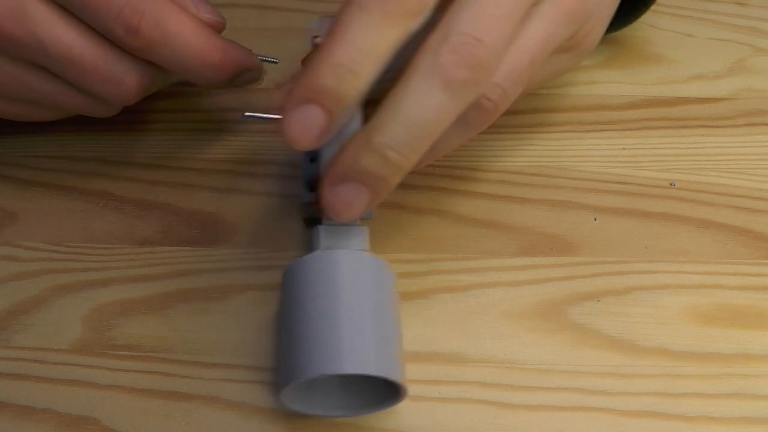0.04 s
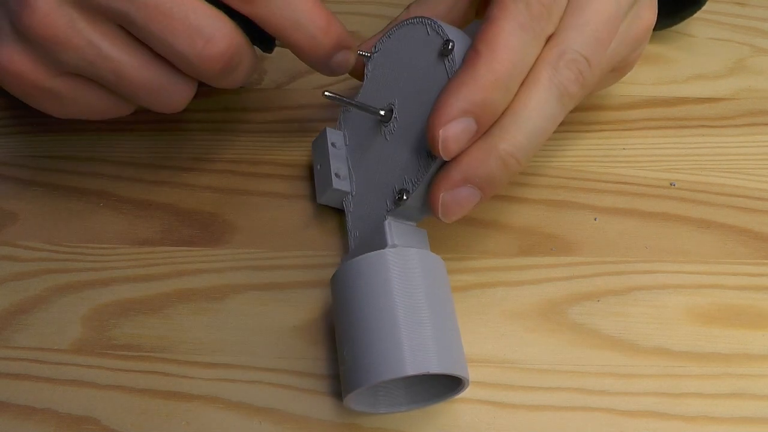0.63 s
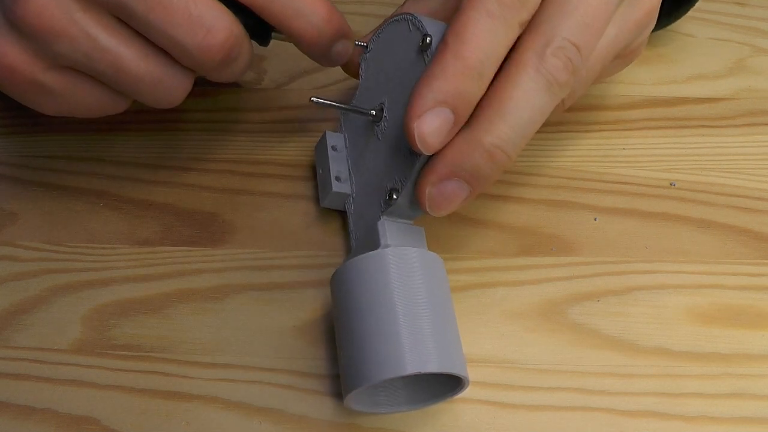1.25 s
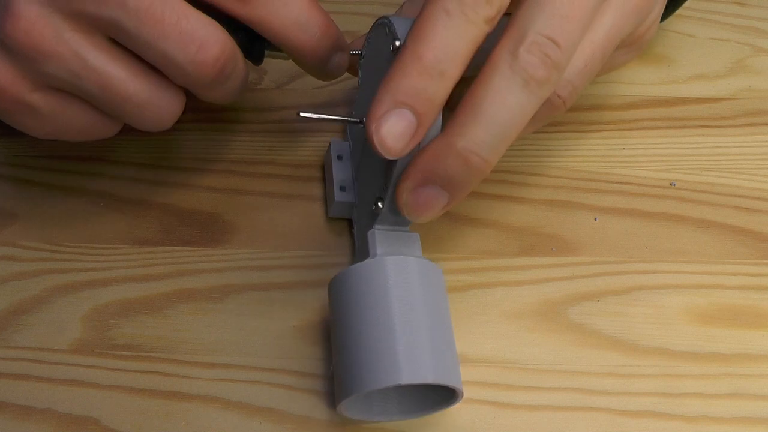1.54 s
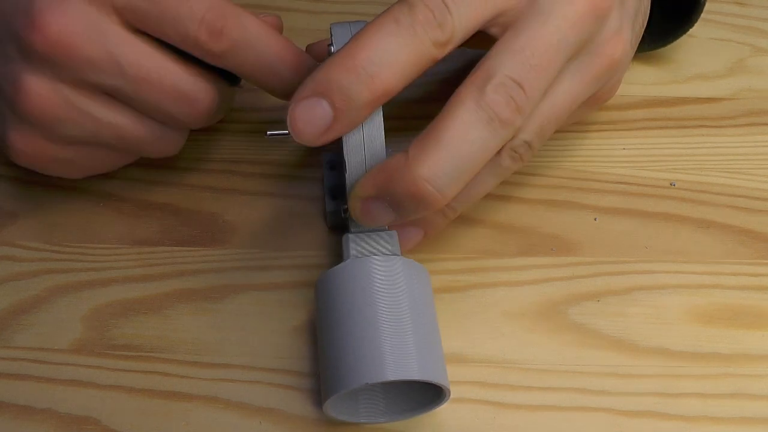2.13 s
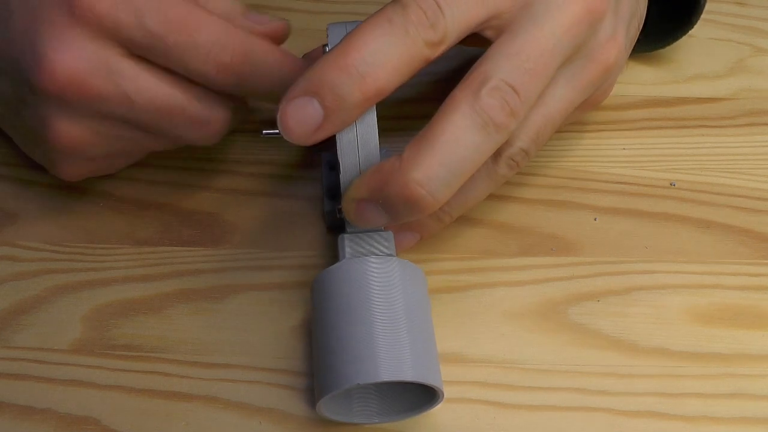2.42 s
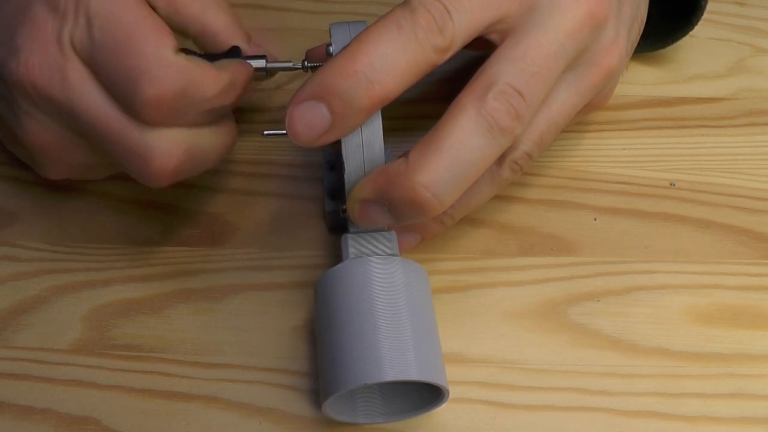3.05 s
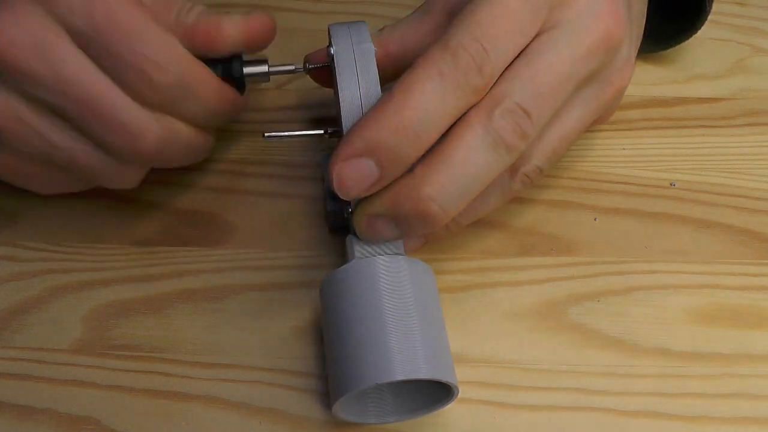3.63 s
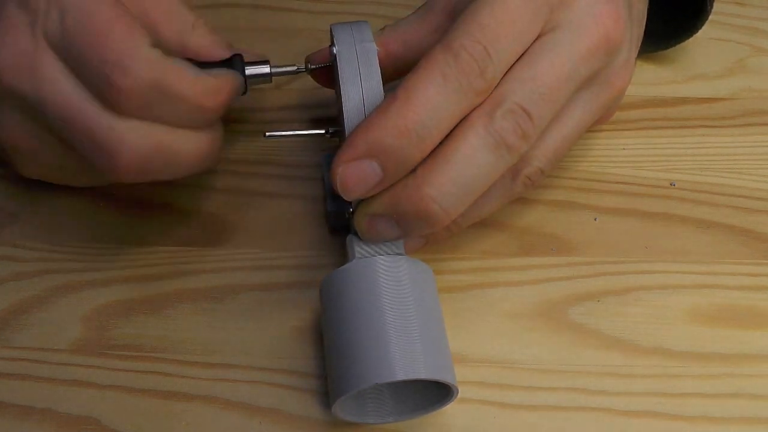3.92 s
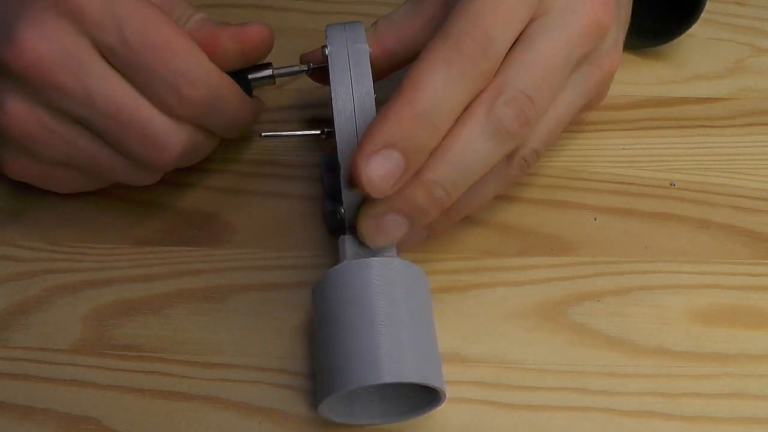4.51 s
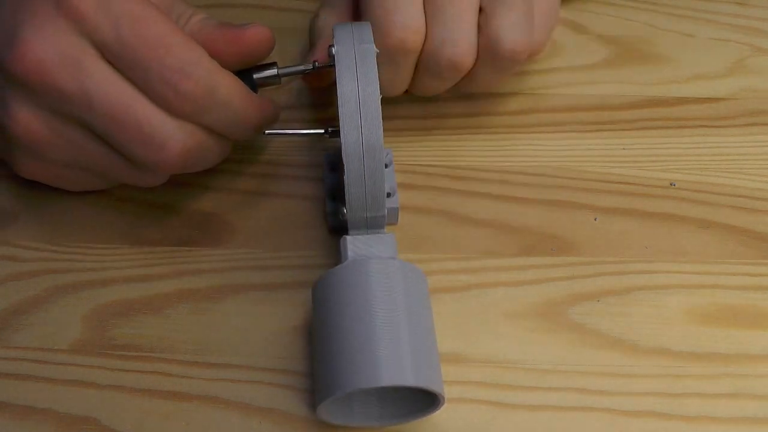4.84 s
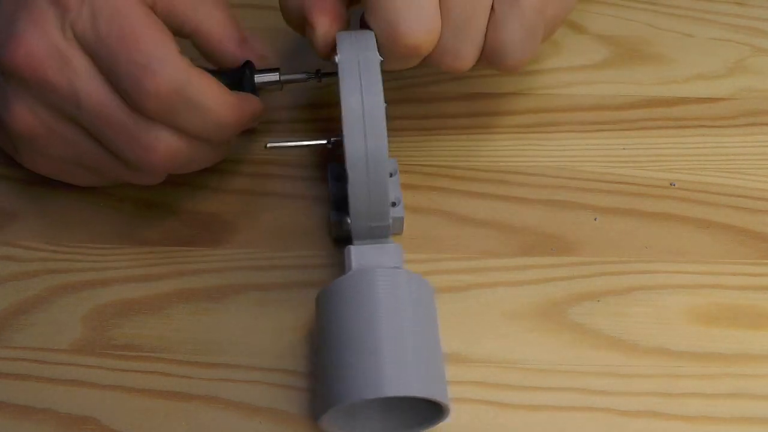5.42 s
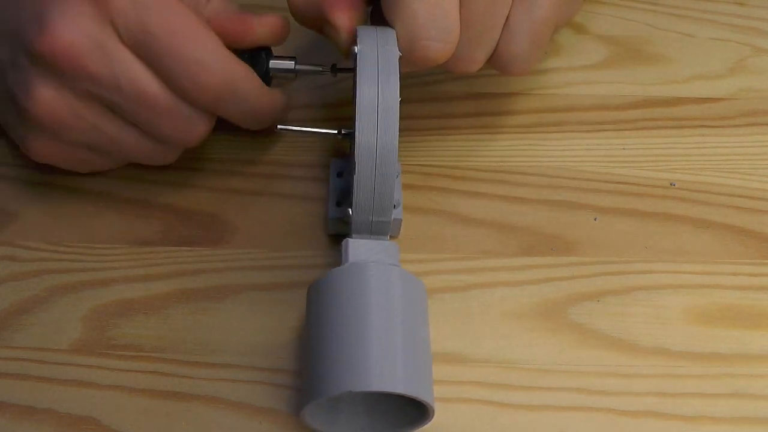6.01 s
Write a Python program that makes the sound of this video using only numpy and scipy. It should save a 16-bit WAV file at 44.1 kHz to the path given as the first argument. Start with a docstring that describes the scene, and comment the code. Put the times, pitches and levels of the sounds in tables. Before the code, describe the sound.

Close to the microphone in a small, quiet room, a plastic part is handled with irregular taps and soft skin rubbing. After a sharp metallic click, a small screwdriver ticks and slips in a screw head, giving brief creaks as it turns. Then the hollow plastic clatters, bumps and drags on a wooden workbench, shaking a loose metal pin into faint jingles, and a few light ticks follow.

```python
"""At a wooden bench in a small room, a small screwdriver turns a screw into a hollow plastic housing.
The bit ticks and slips in the screw head, the housing clacks and bumps on the wood, and a loose steel
pin jingles. Each knock makes the parts ring with their own quickly fading tones. Rubbing fingers,
twists and scrapes are thousands of tiny slips. It all sounds close and central, over a low hush."""
import sys
import numpy as np
from scipy import signal
from scipy.fft import rfft, irfft, next_fast_len
from scipy.io import wavfile

SR = 44100
rng = np.random.default_rng(int(sys.argv[2]) if len(sys.argv) > 2 else 0)


def output_pcm(signal):
    """Save a mono or channel-first signal as 16-bit PCM at the path in sys.argv[1].

    Samples are clipped to [-1, 1] before scaling.
    """
    pcm = np.clip(np.atleast_2d(signal).T, -1, 1) * 32767
    wavfile.write(sys.argv[1], SR, np.round(pcm).astype(np.int16))


N = 276066
TIME = np.arange(N) / SR
AGE = TIME[:SR // 3]   # seconds since a sound began

# Levels in the tables are relative: the functions may turn a whole layer up or down.
# Tone colour of the room's hush: pitch_hz, level_db
HUSH_COLOUR = [(15, -57), (25, -56), (59, -19), (229, -1), (624, -18.5), (714, -13), (887, -7.5),
               (1560, -6), (2110, -23.5), (3250, -11.5), (4490, -10.5), (5730, -21), (7310, -25),
               (14400, -16.5), (16000, -22)]
# Echoes from nearby surfaces: delay_s, level_db
ECHOES = [(0.009, -25), (0.0148, -20), (0.0168, -22), (0.0305, -23), (0.0362, -25)]
# The room's fading tail (fade_s is the time to drop by 60 dB): pitch_hz, fade_s, level_db
ROOM_DECAY = [(121, 0.11, -21), (302, 0.2, -5), (684, 0.3, -9), (1495, 0.31, -13), (3540, 0.27, -11.5),
              (7040, 0.33, -13.5), (14000, 0.092, -37)]
# Standing waves, the tones that bench and room add to each sound: pitch_hz, level_db, fade_s
STANDING_WAVES = [(267, 1, 0.28), (347, -2, 0.24), (492, -2, 0.22), (607, -7, 0.2), (679, -6, 0.22),
                  (926, -7, 0.22), (1197, -9, 0.2), (1390, -9, 0.2), (1675, -6, 0.22)]

# Tone colours of rubbing: pitch_hz, level_db
RUMBLE_COLOUR = [(50, -47), (85, -5.5), (150, -2.5), (220, 3.5), (270, -2), (330, -7), (450, -5.5),
                 (700, -33)]   # hands stirring the bench
PLASTIC_COLOUR = [(250, -32), (500, -4), (750, -2.5), (1000, -1), (1250, 1), (1550, 2), (1750, -2),
                  (2050, -9), (2380, -3), (2700, -7.5), (3050, -8), (4600, -17), (6000, -25.5),
                  (16000, -100)]   # rubbed plastic
HISS_COLOUR = [(2500, 10), (4000, 11.5), (5200, 1.5), (6000, 4.5), (6900, 5.5), (8000, 3), (10000, 5),
               (13000, 8.5), (16000, -7)]   # skin and other sliding contacts
DRAG_COLOUR = [(50, -42), (100, -24), (160, -11), (225, 0), (270, 2), (340, -1), (450, -4), (700, -15),
               (1200, -35)]   # a low drag on the wood
# How strongly the fingers work over time: time_s, bench_db, plastic_db, skin_db
FINGER_LEVELS = [(0.0, -61, -66, -72), (0.16, -51.5, -65, -74), (0.3, -55.5, -51.5, -65),
                 (0.87, -62.5, -63.5, -78), (1.32, -62, -60.5, -76), (1.43, -63.5, -62, -72),
                 (2.02, -58, -63, -74), (2.35, -64, -54.5, -65), (2.91, -65, -66, -70.5),
                 (3.63, -58, -62.5, -64.5), (3.9, -60.5, -60.5, -63), (4.27, -61.5, -62.5, -66),
                 (5.33, -60.5, -56.5, -67.5), (5.6, -61, -50, -64), (5.82, -63.5, -55.5, -64.5),
                 (6.26, -61.5, -68.5, -61)]
# Twists of the screwdriver: middle_s, half_length_s, creak_db, bit_hiss_db
TWISTS = [(2.125, 0.0065, -56, -59), (2.86, 0.028, -52, -52.5), (3.057, 0.019, -53.5, -50),
          (3.26, 0.02, -57, -59.5), (3.36, 0.064, -63, -64.5), (3.506, 0.046, -54, -59),
          (3.612, 0.021, -50.5, -57), (3.73, 0.055, -52, -65), (3.921, 0.027, -57, -55.5),
          (4.101, 0.02, -42.5, -51), (4.151, 0.042, -47, -63), (4.308, 0.018, -65, -60),
          (4.46, 0.024, -52, -55), (4.524, 0.019, -52, -58), (4.622, 0.017, -50, -62),
          (6.11, 0.038, -63.5, -61)]
# Short scrapes and rattles in the plastic, some with a low drag on the wood:
# middle_s, half_length_s, bench_db, plastic_db
SCRAPES = [(0.085, 0.072, -57, -65), (0.152, 0.016, -52, -41.5), (0.195, 0.041, -74, -49.5),
           (0.276, 0.006, -63, -40.5), (0.726, 0.016, -53, -66), (0.882, 0.02, -57.5, -56),
           (1.416, 0.021, -52, -44), (4.997, 0.034, -44, -42.5), (5.41, 0.059, -52, -55.5),
           (5.573, 0.028, -53, -47.5), (5.654, 0.022, -39, -35), (5.765, 0.085, -62, -51)]

# The tones each part rings with when struck: pitch_hz, level_db, fade_s
BENCH_TONES = [(144.5, -9, 0.058), (220, -6.5, 0.054), (264, 1.5, 0.029), (351, -8, 0.047),
               (424.5, -7, 0.042), (530.6, -10, 0.092)]
CUP_TONES = [(586, -5, 0.035), (737, 4.5, 0.051), (837, 0, 0.047), (940, -4, 0.017), (1025, -6, 0.045)]   # the lower ring of the hollow plastic
HOUSING_TONES = [(1210, -7, 0.018), (1400, -3, 0.022), (1465, 0, 0.016), (1620, -7, 0.016)]
SCREW_TONES = [(2355, -6, 0.024), (2620, -3, 0.008), (3040, 0, 0.014), (3250, -4, 0.01), (3600, -4, 0.011),
               (4050, -4, 0.008), (4620, -6, 0.011)]
BIT_TONES = [(5340, -2, 0.01), (6000, -6, 0.005), (6820, -1, 0.012), (7600, -4, 0.006), (8950, -1, 0.005),
             (9800, 1, 0.004), (10800, 0, 0.004), (11900, -2, 0.004), (13500, -9, 0.003)]
PIN_TONES = [(2352, 1, 0.28), (2900, -4, 0.17), (3060, -3, 0.17), (4580, -7, 0.14), (4662, -2, 0.22),
             (4740, -8, 0.12), (5507, -8, 0.15), (6780, -4, 0.15), (6970, -6, 0.11), (8570, -6, 0.18),
             (8700, -6, 0.13), (11000, -3, 0.16), (12910, -10, 0.14), (13860, -10, 0.12)]
# Jolts that shake the loose pin: start_s, level_db
JINGLES = [(0.144, -55), (0.191, -60), (4.976, -62), (5.009, -52), (5.407, -56), (5.546, -52.5), (5.7, -43),
           (5.719, -56), (5.761, -70), (5.816, -66)]
# Knocks, with the housing's pitch under that grip: start_s, housing_db, bench_db, bit_db, pitch_hz
KNOCKS = [(0.131, -45, -47, -85, 1400), (0.144, -46, -65, -62, 1230), (0.278, -31.5, -43.5, -71, 1524),
          (0.286, -31.5, -50, -86, 1455), (0.342, -47.5, -65, -75, 1540), (0.4, -49, -59, -70, 1480),
          (0.666, -51, -70, -84, 1630), (0.704, -45.5, -52, -68, 1270), (0.87, -51, -47, -92, 1300),
          (0.976, -47.5, -53, -73, 1410), (1.097, -37, -47, -56.5, 1224), (1.149, -49, -46.5, -80, 1550),
          (1.212, -37.5, -52, -70.5, 1424), (1.361, -27.5, -50, -42, 1325), (1.415, -54, -47, -72, 1390),
          (1.6418, -41, -34, -74, 1300), (1.885, -54.5, -55, -78, 1540), (2.171, -55, -52, -71, 1350),
          (2.194, -46.5, -62, -58, 1430), (2.2968, -48, -37.5, -39, 1400), (2.299, -21, -43, -28, 1354),
          (2.5626, -31.5, -39.5, -46, 1450), (2.821, -57, -62, -58, 1570), (2.861, -44, -50.5, -57, 1450),
          (2.941, -64, -54.5, -63, 1400), (3.032, -53, -60, -79, 1460), (3.047, -52, -75, -50, 1380),
          (3.053, -52.5, -55, -51, 1350), (3.15, -51, -63, -73, 1480), (3.222, -54, -54, -79, 1560),
          (3.312, -58.5, -63, -60, 1510), (3.366, -53.5, -50.5, -66, 1560), (3.399, -70, -55, -62, 1450),
          (3.481, -47.5, -52, -55.5, 1230), (3.6, -47, -77, -56.5, 1680), (3.65, -49, -64, -59.5, 1250),
          (3.666, -40.5, -52, -67, 1340), (3.861, -52.5, -57, -68, 1270), (4.011, -51, -57, -69, 1390),
          (4.025, -41, -49, -59, 1690), (4.059, -50, -51, -70, 1390), (4.09, -44, -45, -66, 1550),
          (4.151, -41.5, -52, -58, 1470), (4.176, -51.5, -49.5, -64, 1270), (4.277, -59, -50, -77, 1230),
          (4.4, -44.5, -53, -60, 1510), (4.469, -47.5, -56, -60, 1560), (4.491, -50, -48, -62, 1400),
          (4.556, -45.5, -52, -70, 1420), (4.617, -53, -45.5, -70, 1380), (4.977, -39.5, -31, -74, 1230),
          (4.987, -42, -39, -72, 1290), (4.998, -39, -34, -75, 1270), (5.009, -44, -51, -52.5, 1380),
          (5.024, -42, -38.5, -67, 1760), (5.036, -33, -41.5, -71, 1553), (5.043, -27.5, -48, -60, 1444),
          (5.25, -39.5, -61, -64, 1386), (5.376, -51, -52, -66, 1340), (5.407, -41.5, -57, -43, 1470),
          (5.423, -43.5, -39, -62, 1240), (5.446, -45, -44, -63, 1370), (5.509, -39, -49.5, -55.5, 1450),
          (5.546, -40.5, -55, -46, 1790), (5.563, -41, -46.5, -64, 1440), (5.635, -28.5, -51, -79, 1500),
          (5.647, -29.5, -28.5, -46.5, 1420), (5.668, -36, -38, -72, 1360), (5.7, -29, -45, -44.5, 1446),
          (5.718, -39, -48, -47, 1590), (5.76, -46, -61, -67, 1490), (6.03, -46.5, -55, -66, 1380),
          (6.093, -51, -72, -61, 1600), (6.124, -52.5, -61, -63, 1460), (6.243, -45, -59, -65, 1430)]

HOUSING_HZ = 1424   # a knock with this pitch_hz plays HOUSING_TONES at their usual pitch
ATTACK_S = 0.008   # the opening of a knock, which sets its level


def from_db(db):
    """Turn decibels into a number to multiply by."""
    return 10 ** (np.asarray(db) / 20)


def rms_one(x):
    """Scale a sound so that its average strength (rms) is 1."""
    return x / np.sqrt(np.mean(x ** 2) + 1e-20)


def band(x, low_hz, high_hz, order=2):
    """Keep the part of a sound between two pitches."""
    sos = signal.butter(order, [low_hz, min(high_hz, .45 * SR)], "band", fs=SR, output="sos")
    return signal.sosfilt(sos, x + 1e-18)


def coloured(x, colour):
    """Give a steady noise a tone colour and a strength of 1."""
    hz, db = np.transpose(colour)
    size = next_fast_len(N)
    bins_hz = np.maximum(np.arange(size // 2 + 1) * SR / size, 1)
    gains = from_db(np.interp(np.log(bins_hz), np.log(hz), db))
    return rms_one(irfft(rfft(x, size) * gains, size)[:N])


def add(track, start_s, sound):
    """Mix a sound into a track at the given time."""
    start = max(int(round(start_s * SR)), 0)
    track[start:start + len(sound)] += sound[:max(N - start, 0)]


def hush():
    """The steady, soft noise of the room."""
    return coloured(rng.standard_normal(N), HUSH_COLOUR)


def room_tail():
    """Many reflections blur into noise, and each octave of it fades at its own rate."""
    hz, fade_s, db = np.transpose(ROOM_DECAY)
    tail, edges_hz = 0, 70 * 2. ** np.arange(9)
    onset = np.clip((AGE - 0.004) / 0.001, 0, 1)
    for low, high in zip(edges_hz, edges_hz[1:]):
        log_centre = np.log(low * high) / 2
        fade = from_db(-60 * AGE / np.interp(log_centre, np.log(hz), fade_s)) * onset
        noise = band(rng.standard_normal(len(AGE)), low, high)
        tail += from_db(np.interp(log_centre, np.log(hz), db)) * noise * fade / np.linalg.norm(fade)
    return tail


def room():
    """How the room answers a click: early echoes, standing waves and the blurred tail."""
    response = room_tail()
    for delay_s, db in ECHOES:
        add(response, delay_s, from_db(db) * np.hanning(5)[1:-1] / 2)
    for hz, db, fade_s in STANDING_WAVES:
        fade = from_db(-60 * AGE / fade_s)
        response += from_db(db) * 2 * fade / fade.sum() * np.cos(2 * np.pi * hz * AGE)
    return response


def slips(per_s, spread_db):
    """Rubbing is made of tiny random slips, mostly weak, a few strong."""
    sizes = from_db(spread_db * np.minimum(rng.exponential(1, N), 4)) * rng.choice([-1, 1], N)
    return sizes * (rng.random(N) < per_s / SR)


def fingers():
    """Skin creeps over handle and housing, and the hands stir the bench."""
    time_s, *columns = np.transpose(FINGER_LEVELS)
    bench_db, plastic_db, skin_db = [np.interp(TIME, time_s, column) for column in columns]
    rumble = from_db(bench_db - 3) * coloured(slips(per_s=600, spread_db=2.5), RUMBLE_COLOUR)
    rub = from_db(plastic_db - 3.5) * coloured(slips(per_s=2500, spread_db=3), PLASTIC_COLOUR)
    hiss = from_db(skin_db - 3) * coloured(slips(per_s=6000, spread_db=3.5), HISS_COLOUR)
    return rumble + rub + hiss


def swells(strokes):
    """Each stroke swells and dies away: one loudness curve for each of the two level columns."""
    gains = np.zeros((2, N))
    for middle_s, half_length_s, *levels_db in strokes:
        arch = np.maximum(1 - ((TIME - middle_s) / half_length_s) ** 2, 0)
        gains += np.outer(from_db(levels_db), arch)
    return gains


def scrapes():
    """The slips of each twist or scrape shake the bench, sound in the plastic and hiss at the contact."""
    creak, bit_hiss = swells(TWISTS)
    drag, rub = swells(SCRAPES)
    plastic = (creak + rub) * coloured(slips(per_s=1000, spread_db=3.5), PLASTIC_COLOUR)
    bench = (drag + from_db(-5.5) * creak) * coloured(slips(per_s=6600, spread_db=1), DRAG_COLOUR)
    hiss = (bit_hiss + from_db(-22) * rub) * coloured(slips(per_s=2200, spread_db=1.5), HISS_COLOUR)
    return bench + plastic + hiss


def struck(tones, times_s, levels_db, scatter, vary_db, rise_s, grit, tuning=1.0, in_step=False):
    """Blows on one part: each sets its tones ringing with a new mix of strengths."""
    hz, db, fade_s = np.transpose(tones)
    track = np.zeros(N)
    attack = int(ATTACK_S * SR)
    age = AGE[:attack + int(fade_s.max() * SR)]
    fades = from_db(db[:, None] - 60 * age / fade_s[:, None]) * (1 - np.exp(-age / rise_s))
    for start_s, level_db, ratio in zip(times_s, levels_db, np.broadcast_to(tuning, len(times_s))):
        strengths = from_db(vary_db * rng.standard_normal(len(hz)))
        if not in_step:   # each tone may start by swinging either way
            strengths *= rng.choice([-1, 1], len(hz))
        # the grip and the point of contact shift each tone a little
        shifted_hz = hz * ratio * (1 + scatter * rng.standard_normal(len(hz)))
        ring = strengths @ (fades * np.sin(2 * np.pi * np.outer(shifted_hz, age)))
        # a rough contact: the first touch is followed by a few milliseconds of grinding
        contact = grit * rng.standard_normal(attack) * np.exp(-AGE[:attack] / 0.0015)
        contact /= np.sqrt(attack / 8)
        contact[0] = 1
        blow = signal.fftconvolve(ring, contact)
        add(track, start_s, from_db(level_db) * blow / np.std(blow[:attack]))
    return track


def loose_pin(shortest_gap_s=0.006, extra_gap_s=0.016, bounce_loss_db=3):
    """After a jolt the steel pin rings and bounces in its hole, held a little differently each time."""
    start_s, jolt_db = np.transpose(JINGLES)
    bounce = np.arange(5)
    gaps_s = (shortest_gap_s + extra_gap_s * rng.random((len(start_s), len(bounce)))) * (bounce > 0)
    times_s = (start_s[:, None] + np.cumsum(gaps_s, axis=1)).ravel()
    levels_db = (jolt_db[:, None] - 2 - bounce_loss_db * bounce).ravel()
    return struck(PIN_TONES, times_s, levels_db, scatter=0.014, vary_db=3, rise_s=0.0003, grit=0.15)


def faint_ticks(per_s=4, spread_db=2.5):
    """Light touches under the working fingers at random moments, as extra rows like those in KNOCKS."""
    count = int(per_s * N / SR)
    start_s = (np.arange(count) + rng.random(count)) / per_s
    levels_db = np.array([-56, -60, -71]) + spread_db * rng.standard_normal((count, 3))
    return np.column_stack([start_s, levels_db, np.full(count, HOUSING_HZ)])


def cracks(times_s, levels_db):
    """A hard contact sends out a sharp spike of air pressure and about a millisecond of noise."""
    track = np.zeros(N)
    age = AGE[:int(ATTACK_S * SR)]
    for start_s, db in zip(times_s, levels_db):
        spike = -from_db(19) * np.exp(-age / 0.00008)
        burst = from_db(14) * rng.standard_normal(len(age)) * np.exp(-age / 0.00049)
        add(track, start_s, from_db(db) * (spike + burst))
    return band(track, 110, 15000, order=1)


def knocks():
    """Tool and housing knock: the steel bit answers at once, plastic and wood swell a little later."""
    start_s, housing_db, bench_db, bit_db, pitch_hz = np.vstack([KNOCKS, faint_ticks()]).T
    # a blow also reaches cup and screw, at a blend of the other three levels
    parts_db = [housing_db, bench_db, bit_db]
    cup_db = np.average(parts_db, axis=0, weights=(0.45, 0.41, 0.19)) + 1
    screw_db = np.average(parts_db, axis=0, weights=(0.59, 0.021, 0.38)) - 1
    screw_db = np.minimum(screw_db, -32.5)   # the screw has only so much room to rattle
    bench = struck(BENCH_TONES, start_s - 0.00012, bench_db,
                   scatter=0.036, vary_db=4, rise_s=0.00074, grit=0.27)
    cup = struck(CUP_TONES, start_s, cup_db, scatter=0.055, vary_db=5, rise_s=0.00051, grit=0.057)
    housing = struck(HOUSING_TONES, start_s, housing_db, scatter=0.02, vary_db=3, rise_s=0.0008,
                     grit=0.2, tuning=pitch_hz / HOUSING_HZ, in_step=True)
    screw = struck(SCREW_TONES, start_s, screw_db, scatter=0.022, vary_db=1, rise_s=0.0011, grit=0.51)
    bit = struck(BIT_TONES, start_s, bit_db - 0.5, scatter=0.025, vary_db=3.5, rise_s=0.0001, grit=1)
    # each part passes sound to the air well only in its own range of pitch
    wood = band(bench, 145, 750)
    plastic = band(cup, 370, 1630) + band(housing, 760, 2380)
    steel = band(screw, 1600, 5400) + band(bit, 3500, 20000)
    return wood + plastic + steel + cracks(start_s, bit_db)


def scene():
    """The work sits near the middle, a little to the right; room tail and low hush add some width."""
    work = knocks() + loose_pin() + scrapes() + fingers()
    # mid is what left and right share; side is how they differ
    mid = work + from_db(-63.5) * hush() + signal.fftconvolve(work, room())[:N]
    side = from_db(-9) * signal.fftconvolve(work, room_tail())[:N]
    side += from_db(-70) * band(hush(), 46, 800)
    side -= from_db(-24) * band(mid, 240, 610, order=1)   # the wide bench top sends more to the right
    side += from_db(-82.5) * rms_one(band(rng.standard_normal(N), 34, 110, order=1))   # faint rumble
    return np.array([mid + side, mid - side]) * from_db([[-0.06], [0.06]])


def record(dry):
    """Cut off the very highest treble steeply."""
    cutoff_hz = 16200
    return signal.sosfilt(signal.ellip(12, .1, 80, cutoff_hz, fs=SR, output="sos"), dry)


dry = scene()
out = record(dry)
output_pcm(out)
```